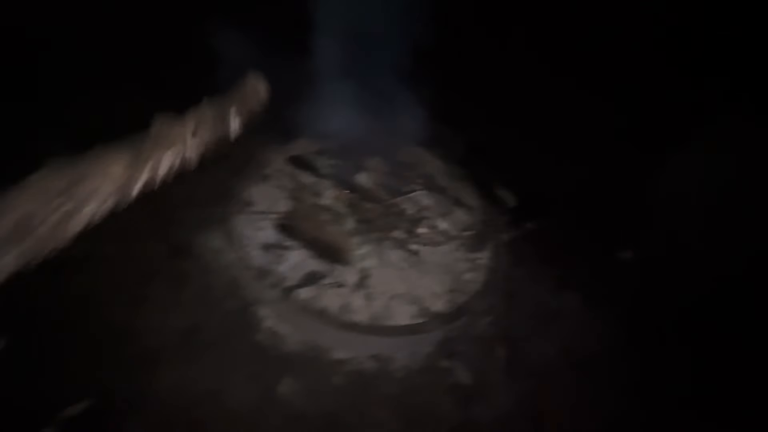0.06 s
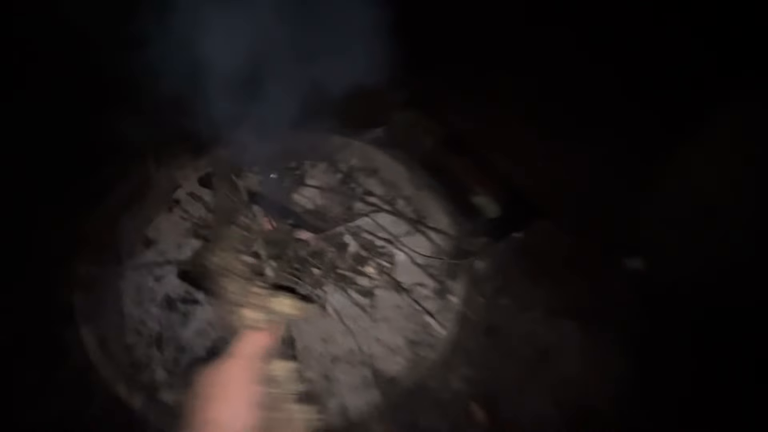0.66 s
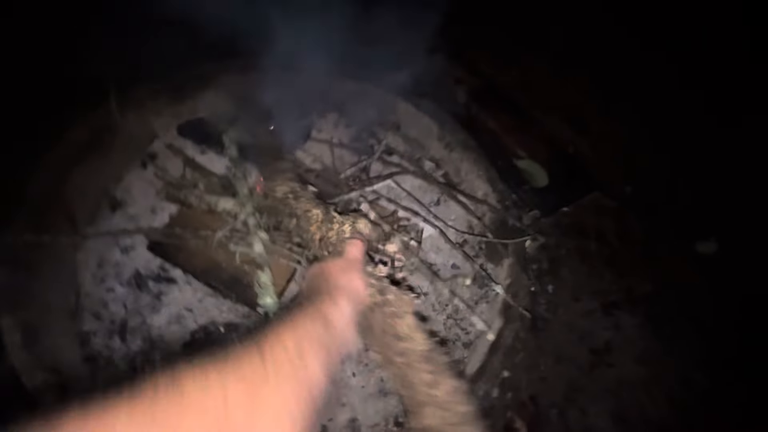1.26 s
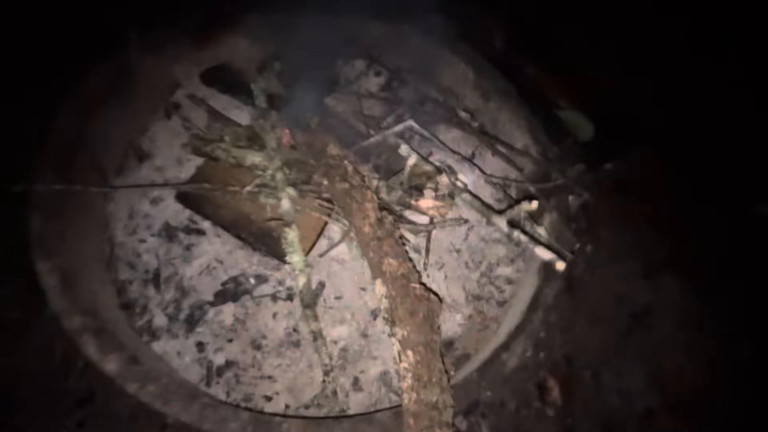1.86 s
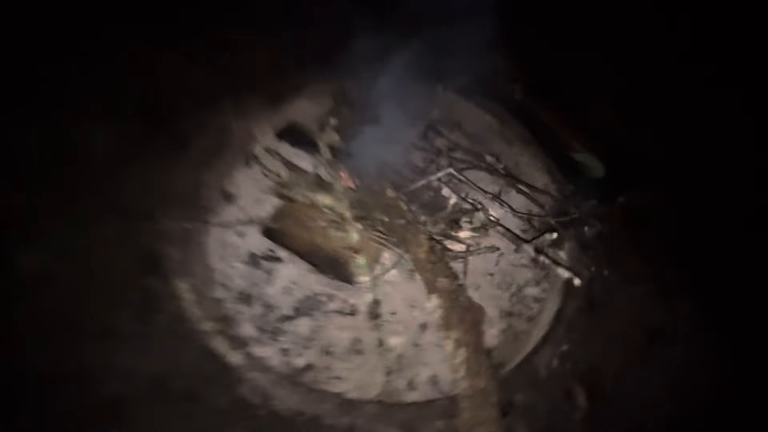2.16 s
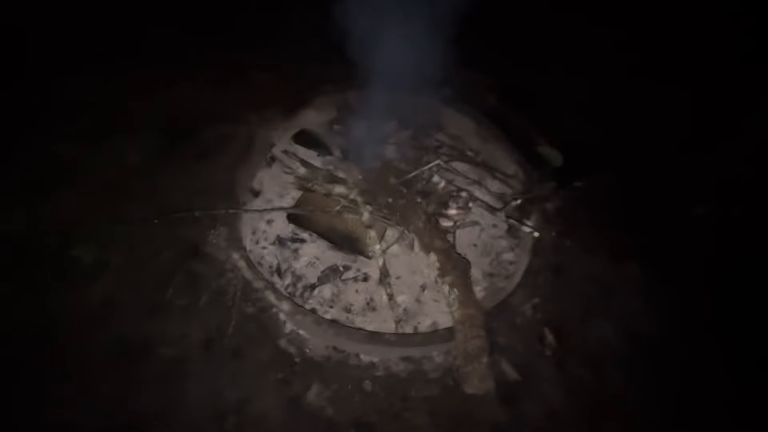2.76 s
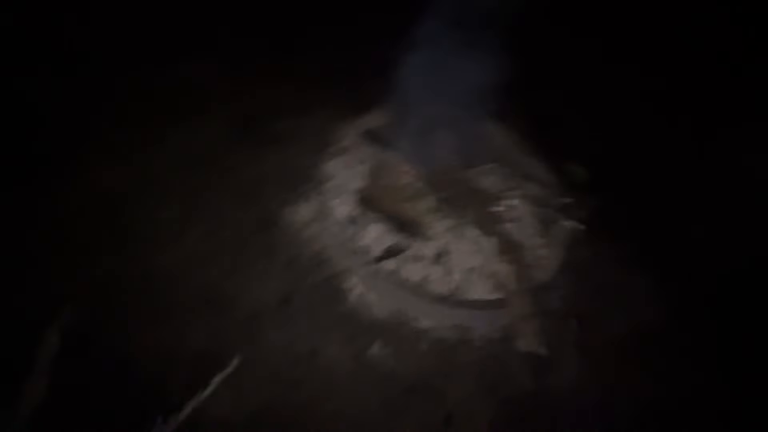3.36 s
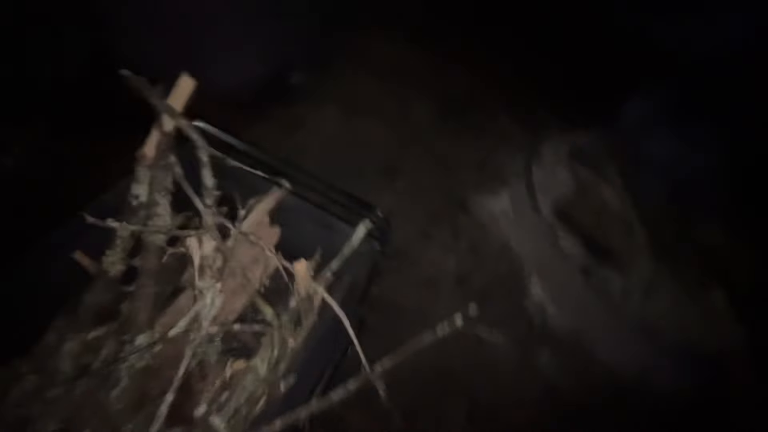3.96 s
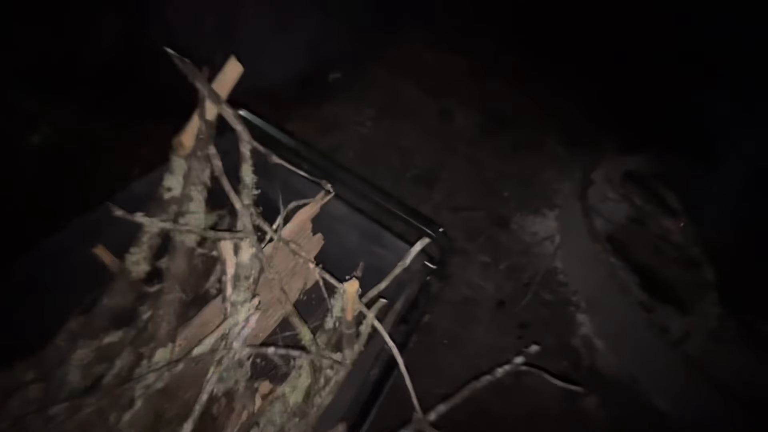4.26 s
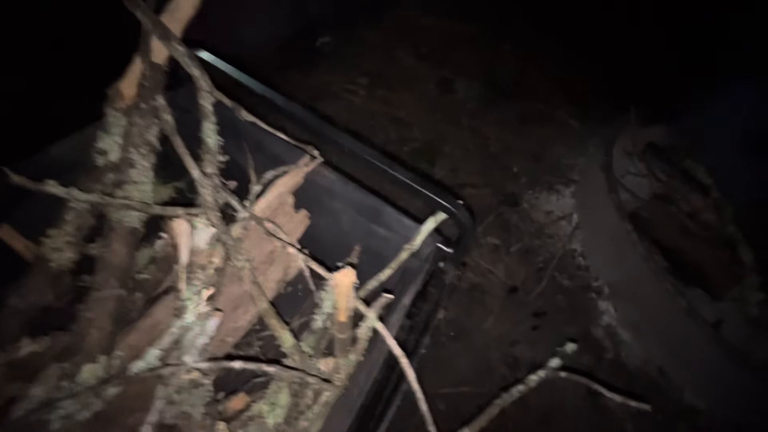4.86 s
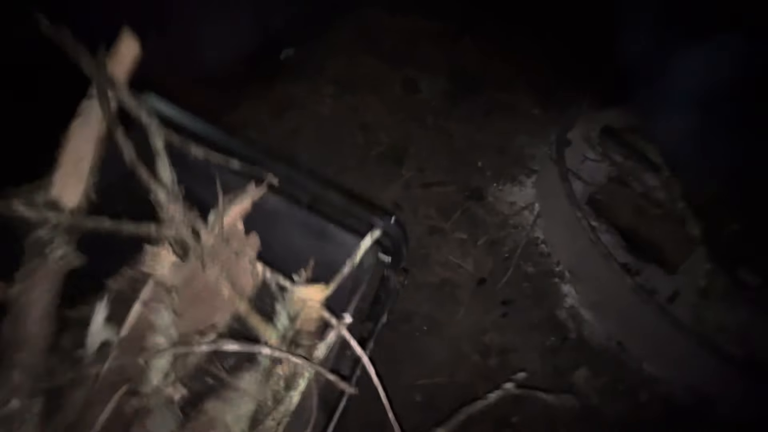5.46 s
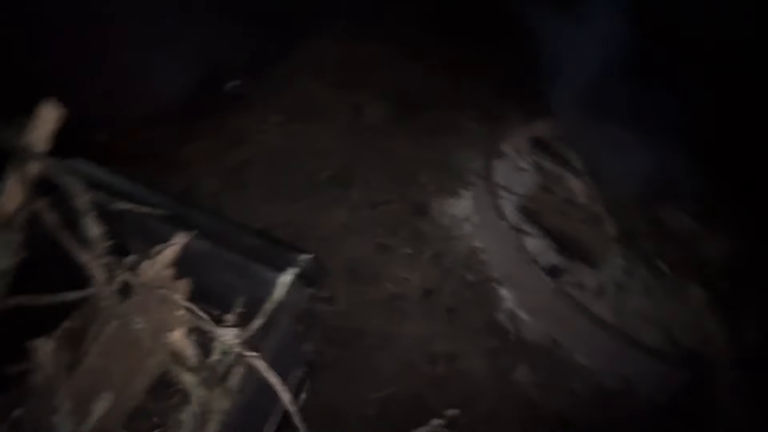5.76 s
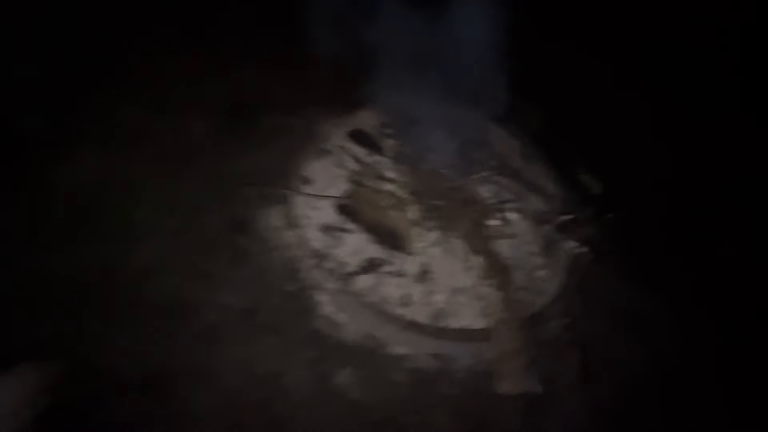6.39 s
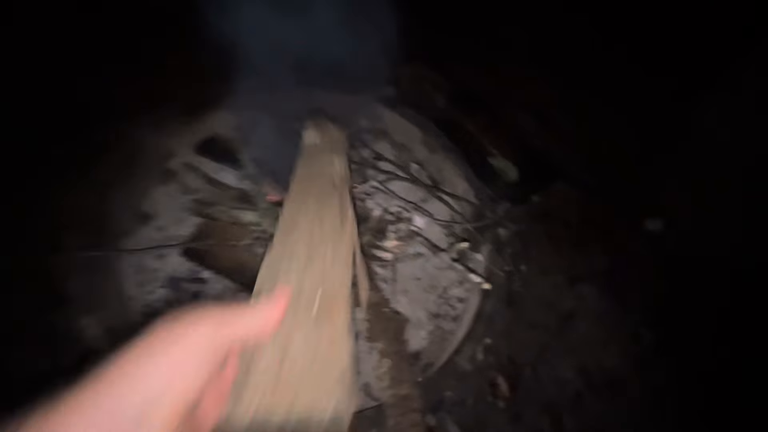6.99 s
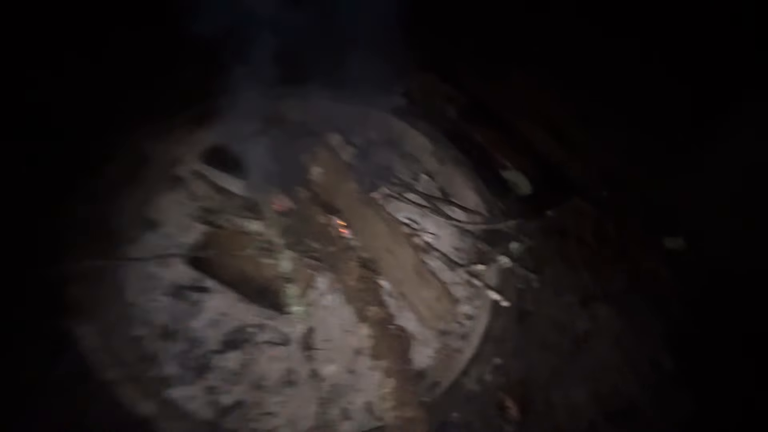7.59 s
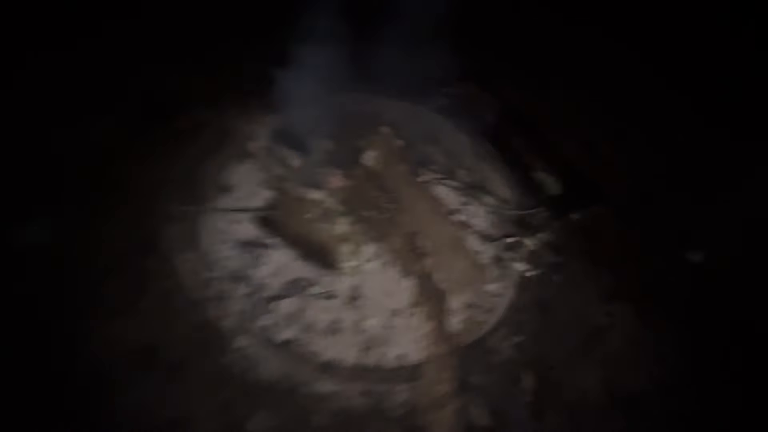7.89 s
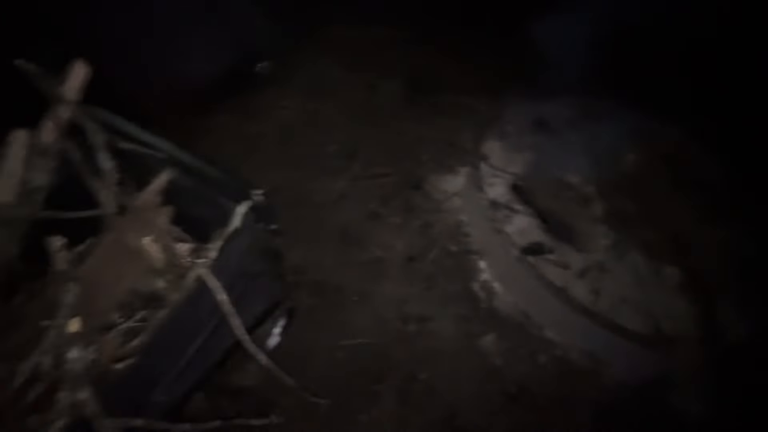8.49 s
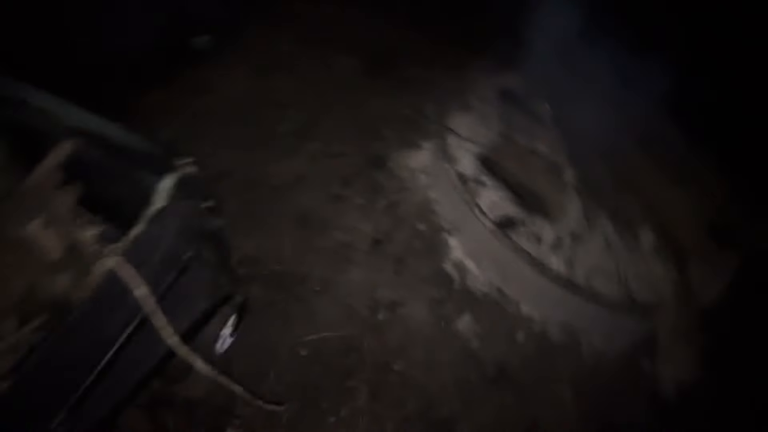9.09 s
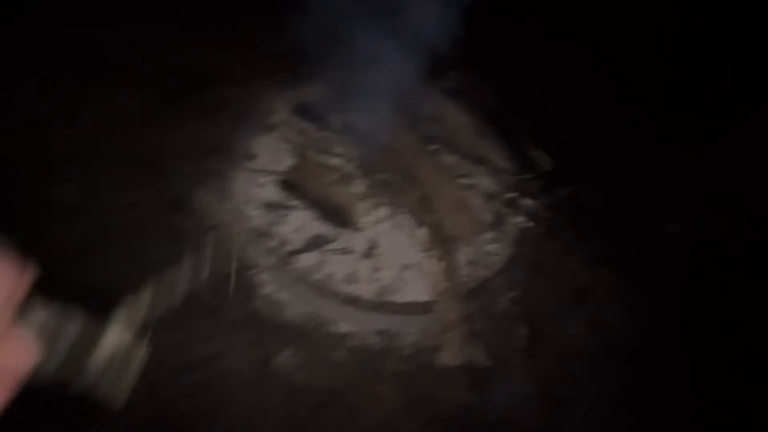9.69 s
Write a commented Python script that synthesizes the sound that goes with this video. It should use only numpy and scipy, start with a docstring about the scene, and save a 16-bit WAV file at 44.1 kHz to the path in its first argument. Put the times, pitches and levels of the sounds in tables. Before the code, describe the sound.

A portable generator hums steadily some way off at a quiet outdoor campsite. Close to the moving microphone, a log is laid on a fire pit with dull knocks and a rasp of bark. After a few soft steps, a plank is dragged from a plastic bin of dry sticks, scraping, snapping twigs and bumping the sides. It then drops on the fire with a sharp crack and thud. Embers tick faintly.

```python
"""Campfire and distant generator

A portable generator hums some way off at a night campsite, its governor gently hunting. Close by, a log
is laid on the fire pit, then a split plank is dragged out of a plastic bin of dry sticks and dropped on
the fire. Wood rasps as it catches and slips, and rings when struck; bark crunches, twigs snap, embers
tick. The engine's colour shifts as the microphone is carried about."""
import sys
import numpy as np
from scipy import signal
from scipy.fft import rfft, irfft, next_fast_len
from scipy.io import wavfile
from scipy.ndimage import uniform_filter1d, map_coordinates

SR = 44100
rng = np.random.default_rng(int(sys.argv[2]) if len(sys.argv) > 2 else 0)


def transcribe(u):
    """Save the signal u as a 16-bit wav file named by the first command-line argument.

    u: samples, shape (n,) or (channels, n), limited to [-1, 1]; the rate is SR.
    q: integer samples, one column per channel.
    """
    v = np.clip(np.atleast_2d(u).T, -1, 1)
    q = np.round(v * 32767).astype(np.int16)
    wavfile.write(sys.argv[1], SR, q)


N = 429532
FFT_SIZE = next_fast_len(N, real=True)
TIME, FREQ = np.arange(N) / SR, np.fft.rfftfreq(FFT_SIZE, 1 / SR)

# The governor hunting: time_s, speed_rpm
ENGINE_SPEED = [(0, 3587), (0.6, 3680), (1.15, 3616), (2.15, 3654), (2.45, 3615), (3.6, 3649), (3.9, 3632),
                (5.2, 3683), (5.95, 3620), (6.35, 3708), (7.1, 3609), (7.35, 3655), (8.15, 3616),
                (8.8, 3700), (9.1, 3646), (9.74, 3630)]
# The listener turning: time_s, turn (0 faces the fire, 1 the bin)
FACING = [(0, .05), (3.3, 0), (3.65, .55), (4.0, 1), (4.6, .85), (5.3, .5), (6.1, .25), (7.1, 0),
          (7.9, .05), (8.3, .65), (8.7, .88), (9.1, .4), (9.74, .05)]
# The three pulses of an engine cycle: harmonic, level_db
INTAKE_TONES = [(1, -67), (2, -45), (3, -51.5), (4, -44)]
EXHAUST_TONES = [(5, -45), (6, -44.5), (7, -51), (8, -47.5)]
MUFFLER_TONES = [(17, -58), (18, -62), (20, -67)]
# Exhaust overtones that swell as the listener moves: harmonic, [time_s, level_db]
EXHAUST_SWELLS = [(9, [(0, -50.5), (2, -51.5), (3.4, -51), (4.2, -61), (4.6, -64), (5.2, -48.5), (7, -51.5),
                  (9.74, -51.5)]), (11, [(0, -51.5), (0.5, -52.5), (1.9, -57.5), (2.7, -85), (3.5, -69),
                  (4.1, -53), (4.5, -50.5), (5.3, -59), (6.1, -60), (7.8, -53), (8.3, -73), (8.8, -58),
                  (9.3, -64), (9.65, -51)])]
# Tone of the mechanical noise: freq_hz, level_db
CLATTER_EQ = [(20, -100), (60, -84), (200, -73.5), (300, -81), (420, -83.5), (560, -83), (680, -88),
              (2000, -86.5), (3700, -89), (5000, -91), (6200, -98.5), (9400, -101), (11500, -117),
              (16000, -117)]
# Panel and cooling fin resonances: pitch_hz, width_hz, boost_db
PANEL_PEAKS = [(2390, 243, 9), (3280, 210, 5.5), (4270, 160, 6.5), (4860, 150, 3.5), (5260, 520, 10.5),
               (7350, 1300, 5)]
# How much of the clatter loops with each cycle: freq_hz, share (0 to 1)
CLATTER_REPEATS = [(300, 0.49), (600, 0.64), (1200, 0), (2500, 0.37), (6000, 0)]
# Muffler shell, tank and valve cover:
# cycle_place (0 to 1), looseness (0 to 1), [pitch_hz, mode_db, t60_s], [time_s, level_db]
RINGING_PARTS = [(0.191, 0.67, [(410, 15, 0.15), (449.5, 16.5, 0.14), (574.6, 7, 0.23)], [(0, -75),
                 (1, -56), (2, -66), (2.6, -52), (3.2, -53), (4.2, -70), (6, -56), (7.1, -63.5), (8.4, -57),
                 (9.74, -56.5)]), (0.0983, 1, [(764, -5, 0.18), (858, 6, 0.082)], [(0, -63), (1, -63),
                 (2.5, -67), (3.1, -53), (3.6, -67), (4.4, -58.5), (6.3, -58), (7.2, -60), (8.4, -66),
                 (8.8, -58), (9.2, -68), (9.74, -71)]), (0.6, 0.088, [(1177, 0, 0.11)], [(0, -57),
                 (0.6, -54), (2.3, -60), (3.4, -49.5), (3.9, -63), (4.5, -53.5), (6.2, -54.5), (7.1, -58),
                 (8, -59), (8.4, -56.5), (9.1, -55.5), (9.74, -52)]), (0.6, 0.11, [(1270, 0, 0.2)],
                 [(0, -60), (1.1, -53), (2.3, -61), (3.4, -51.5), (4, -65), (6.5, -55), (7.6, -57),
                 (8.25, -52.5), (8.8, -64), (9.74, -59)]), (0.56, 0.73, [(1452, 0, 0.15)], [(0, -70),
                 (0.4, -51), (1.2, -72), (2.9, -54), (4, -62), (5, -65), (6.6, -53), (7.4, -59),
                 (9.74, -76)]), (0.39, 0.39, [(2187, 5.5, 0.06), (2270, -2, 0.023)], [(0, -62),
                 (0.6, -57.5), (1.15, -53.5), (1.8, -56), (2.4, -62), (4, -62), (6.3, -65), (7.1, -56),
                 (8.2, -64), (9.74, -73)]), (0.58, 1, [(2780, 0.5, 0.069), (2913, 2, 0.059)], [(0, -66),
                 (1, -60), (2, -62), (3.3, -61.5), (5, -70), (7.1, -60), (8.2, -69), (9.74, -97)]),
                 (0.85, 0.86, [(2396, 7, 0.045), (2527, 2, 0.042)], [(0, -69), (1.2, -75), (2.6, -78),
                 (4.3, -55), (7, -78), (8.7, -89), (9.74, -73)])]
# Fader ride on the metallic whine: time_s, level_db
WHINE_LEVEL = [(0, -68), (.65, -63), (1, -57), (1.45, -73), (3.4, -63), (3.9, -53), (4.2, -67), (7.6, -65),
               (9.74, -85)]
# Left-right likeness of distant and of close sound: freq_hz, correlation
FAR_LIKENESS = [(60, -1), (300, 0.2), (1000, .5), (3000, 0.27), (10000, -0.06)]
NEAR_LIKENESS = [(150, .99), (600, .94), (2000, .7), (8000, .65)]
# Engine hiss and whine flaring as the listener turns, with a scuff or two: start_s, length_s, level_db,
# pitch_hz, spread_octaves
ENGINE_FLARES = [(0.259, 0.52, -57, 6660, 0.19), (2.846, 0.23, -53.5, 1200, 0.2), (3.385, 0.69, -56, 5760, 0.27),
                 (3.946, 0.15, -50, 4860, 0.34), (3.875, .52, -51.5, 1900, 0.058), (6.604, 0.54, -60, 6860, 0.11)]
# Twigs breaking, plus a pair of ember pops at 4.4 s that crack the same way: start_s, level_db, pitch_hz,
# spread_octaves, t60_s, pan_db (left minus right)
TWIG_SNAPS = [(0.467, -36, 3300, 0.6, .016, 0), (0.475, -34, 3500, 0.53, .016, 0),
              (1.234, -31.5, 6960, 1.2, 0.025, -10), (1.3115, -39, 8500, 0.27, 0.02, -7),
              (1.341, -39, 7500, 0.54, .02, -4), (1.398, -43, 8000, 0.53, 0.034, -7),
              (1.453, -36, 2200, 1, 0.023, -12), (1.4746, -41, 8000, .8, .012, -4),
              (1.492, -31, 6000, 1.2, .014, -4), (2.0253, -44, 10000, .7, .012, 0),
              (2.0572, -35, 1700, 0.22, .012, 2), (3.3074, -43, 3500, .6, .025, -4),
              (4.408, -34, 5800, 0.31, 0.013, 5), (4.422, -42, 6000, 0.25, 0.013, 5),
              (4.7432, -45, 8000, .9, .012, 1), (4.7665, -34, 6000, 1.3, 0.013, 3),
              (4.856, -33.5, 5500, 0.48, 0.016, 6), (4.947, -33, 7500, 1.5, 0.02, 3),
              (4.977, -28, 6860, 1, 0.017, 8), (4.989, -43, 9000, .6, .01, 0),
              (5.0972, -34.5, 2000, 1, 0.048, 2), (5.155, -29.5, 7000, 0.72, 0.018, 2),
              (5.232, -33, 3280, 0.49, 0.046, -1), (5.3075, -33, 7000, 1.4, .018, 1),
              (5.3946, -35.5, 3520, 0.35, .03, 12), (5.408, -33, 7000, .9, 0.016, 0),
              (5.363, -36, 3800, 0.39, .02, 2), (5.511, -42, 3200, .7, 0.022, 2),
              (5.547, -36, 4000, 0.63, 0.033, 2), (5.639, -28, 5000, 1.3, 0.011, -6),
              (5.6946, -33, 10500, .3, .012, 0), (5.716, -39, 3000, 1, 0.079, 6),
              (5.7395, -23, 2580, 0.75, 0.052, 2), (5.76, -29, 2940, 1.6, 0.073, -3),
              (5.8602, -36, 6000, 1, .012, 1), (5.8986, -40, 6130, 0.65, .012, 4),
              (7.315, -36.5, 4000, 0.59, 0.076, 0), (7.326, -30, 2200, 0.68, 0.051, 0),
              (7.3364, -8.5, 4940, 0.5, 0.011, -10), (7.36, -18.5, 8600, 0.4, 0.0095, -7),
              (7.373, -33, 2250, 0.07, 0.057, -3), (7.4, -37, 2000, .25, .05, -2),
              (7.459, -46.5, 4600, 0.69, 0.18, -1)]
# Embers popping: start_s, level_db
EMBER_POPS = [(0.7444, -53), (2.904, -46), (6.4294, -50), (6.627, -37), (7.1794, -44), (7.759, -31),
              (8.687, -46), (8.7194, -52), (9.0923, -47)]
# The log sliding onto the fire, the plank out of the bin: hollow_db, pan_db, [time_s, force_db]
DRAGS = [(0, 0, [(1.21, -70), (1.25, -39.5), (1.31, -51.5), (1.42, -47), (1.56, -50), (1.65, -59),
         (2.0, -53), (2.3, -84)]), (1.5, 1.2, [(4.72, -64), (4.79, -48), (4.9, -53.5), (5.03, -50.5),
         (5.12, -47.5), (5.33, -37.5), (5.55, -40.5), (5.61, -43.5), (5.8, -42.5), (5.97, -56.5),
         (6.15, -80)])]
# Tone of the scraping wood and of the pile beneath it: freq_hz, gain_db
RASP_EQ = [(200, -29), (600, -12), (1200, 3), (2500, -4), (5500, -7), (8500, -12.5), (16000, -13.5)]
RUMBLE_EQ = [(20, -36), (50, -3.5), (150, 3.5), (320, 3.5), (550, -7.5), (1200, -18.5), (4000, -115)]
# How each struck thing rings: thing -> [pitch_hz, level_db, t60_s]
MODES = { "log": [(161, -10, 0.12), (460, -7.5, 0.062), (714, 0.5, 0.11), (880, -8, 0.085),
         (1130, -1, 0.037), (1600, 1, 0.04), (2150, 5.5, 0.037), (3200, -15, 0.026)],
         "pit": [(109, -10, 0.13), (197, -8, 0.24), (223, -3.5, 0.14), (303, 5, 0.042), (398, 5, 0.032),
         (726, -12, 0.081), (1290, 3, 0.007)], "branch": [(265, -11, .08), (341, -3.5, 0.11),
         (453, 0, 0.025), (840, 0.5, 0.021), (913, -0.5, 0.06), (1140, -1, 0.041), (1640, -12, .06),
         (2060, -15, 0.081)], "stick": [(845, -0.5, 0.11), (3023, 3.5, 0.036), (3080, -5, 0.039)],
         "bin": [(96, -23, 0.19), (163.3, -8.5, 0.25), (242, -2, 0.076), (293, 5.5, 0.05),
         (330, 4.5, 0.034), (600, 0, 0.042), (744, -6.5, 0.042), (914, -10, 0.045), (1260, -16, 0.12),
         (1580, -16.5, 0.065), (2000, -2, 0.02)], "stump": [(453, -2, 0.03), (567, 4, 0.025),
         (699, 2.5, 0.047), (903, 5.5, 0.021), (937, 4, 0.028), (1310, -2, 0.028)],
         "plank": [(551, -15.5, 0.065), (1014, -9, 0.092), (1370, -3.5, 0.02), (1617, -4.5, 0.046),
         (1770, 0, 0.013), (2260, -18, 0.18), (3780, 8, 0.011), (3950, 13.5, 0.01), (4400, 5.5, 0.0091),
         (5260, 7, 0.0064), (5520, -8, 0.013), (8000, -5, 0.0086)]}
# Wood hits: start_s, thing, level_db, contact_hz (top of the range it excites), crunch_db, pan_db
KNOCKS = [(1.2335, "log", -37, 1090, -46, 0), (1.248, "log", -21, 820, -53, 1),
          (1.26, "log", -18, 200, -60, -5), (1.352, "log", -42, 1360, -37.5, -2),
          (1.402, "log", -49, 980, -44, -3), (1.4905, "log", -34.5, 2900, -39, -8),
          (1.5446, "pit", -21, 1470, -36, -1.5), (1.5758, "pit", -33.5, 500, -55, -4),
          (1.598, "pit", -38, 920, -43, -1.5), (4.771, "branch", -18.5, 2400, -30, 1),
          (5.066, "bin", -32, 594, -43, 3), (5.082, "bin", -27, 300, -52, 7),
          (5.095, "bin", -28, 280, -52, 1), (5.157, "stick", -25.5, 6140, -34, -0.5),
          (5.6402, "stump", -16, 1990, -28, 2.5), (5.719, "bin", -22.5, 525, -54, 3),
          (5.7462, "bin", -12.5, 1930, -27.5, 4), (5.767, "bin", -25, 1180, -29.5, 6),
          (7.3377, "plank", -14, 9000, -24, 1.5), (7.353, "plank", -3, 680, -32, -1)]
# Litter underfoot: start_s, level_db, t60_s, pan_db
FOOTSTEPS = [(2.0572, -30, 0.016, 2), (2.914, -44, 0.071, 4), (3.175, -38, 0.04, 11),
             (5.926, -38.5, 0.032, 8), (6.627, -40.5, 0.035, 5)]
# Thuds on the ground and the bin: start_s, level_db, pan_db
BUMPS = [(2.058, -39, 14), (2.159, -42, 0), (5.085, -32, 9)]
# Unequal colour of the two microphone ports: freq_hz, left_minus_right_db
PORT_TILT = [(60, -4), (300, -2.5), (500, -3), (800, 4), (2200, 1.5), (3000, 2.5), (4200, 7), (6400, 12.5),
             (8200, -1), (15000, -0.5)]

ON_FIRE = ("log", "pit", "plank")
BIN_LEAD_S, FIRE_LEAD_S = .00032, .00015  # how much sooner the left port hears each spot


def amp(db):
    """Decibels to gain."""
    return 10 ** (np.asarray(db) / 20)


def unit_rms(x):
    """Scales to rms 1."""
    return x / np.sqrt(np.mean(x ** 2) + 1e-20)


def over_time(points):
    """Draws an automation curve through the points."""
    return np.interp(TIME, *np.transpose(points))


def over_freq(points, hz=FREQ):
    """Draws a curve through the points on a log-frequency axis."""
    f, value = np.transpose(points)
    return np.interp(np.log(hz + 1), np.log(f + 1), value)


def to_sound(spectrum):
    """Turns a full-length spectrum into sound."""
    return irfft(spectrum, FFT_SIZE)[..., :N]


def panned(db):
    """Left and right gains for a level difference."""
    return amp(np.array([[db], [-db]]) / 2)


def add(mix, start_s, sound):
    """Drops a sound into the mix."""
    part = mix[:, round(start_s * SR):][:, :sound.shape[1]]
    part += sound[:, :part.shape[1]]


def paired(z, likeness):
    """Makes the second of two unrelated signals partly like the first."""
    c = np.clip(likeness, -1, 1)
    return np.array([z[0], c * z[0] + np.sqrt(1 - c ** 2) * z[1]])


def arriving(x, lead_s):
    """Lets a sound reach the left port sooner than the right."""
    return np.array([map_coordinates(channel, [(TIME + side * lead_s) * SR], order=3)
                     for channel, side in zip(x, (.5, -.5))])


def noise_band(size, hz, octaves):
    """Stereo noise in a bell around hz."""
    f = np.fft.rfftfreq(size, 1 / SR) + 1
    bell = np.exp(-(np.log2(f / hz) / octaves) ** 2 / 4)
    noise = paired(rfft(rng.standard_normal((2, size))), over_freq(NEAR_LIKENESS, f))
    return unit_rms(irfft(noise * bell, size))


def burst(hz, octaves, t60, rise_s=0.001, grain_db=6.0):
    """A quick, ragged burst of noise that dies away, as when fibres break."""
    t = np.arange(8192) / SR
    grain = unit_rms(uniform_filter1d(rng.standard_normal(len(t)), int(4 * SR / hz) + 1))
    fade = amp(-60 * t / t60) * (1 - np.exp(-t / rise_s))
    ragged = noise_band(len(t), hz, octaves) * amp(grain_db * grain)
    return unit_rms(ragged * fade) * np.sqrt(np.mean(fade ** 2))


def wander():
    """A slow random drift of rms 1."""
    sways = (np.sin(2 * np.pi * (hz * TIME[::256] + rng.random())) for hz in np.geomspace(.3, 1.6, 12))
    return unit_rms(sum(sways)).repeat(256)[:N]


def hum(cycles, intake_at=0.016, exhaust_at=0.4134, muffler_at=0.2586, uneven=0.059):
    """Each cycle gulps air, shakes the muffler and puffs exhaust; no two firings are quite equal."""
    def pulse(tones, at):
        return sum(amp(db) * np.cos(2 * np.pi * round(k) * (cycles - at)) for k, db in tones)

    count = int(cycles[-1]) + 3
    strength = 1 + uneven * np.interp(cycles, np.arange(count), rng.standard_normal(count))
    swells = [(k, over_time(level)) for k, level in EXHAUST_SWELLS]
    exhaust = pulse(EXHAUST_TONES + swells, exhaust_at)
    return strength * (pulse(INTAKE_TONES, intake_at) - exhaust + pulse(MUFFLER_TONES, muffler_at))


def chuff(cycles, level_db=-56.0, at=0.26, width=0.31):
    """Gas rushes out of the muffler with every firing: a round, breathy puff."""
    from_peak = (cycles - at + .5) % 1 - .5
    gate = np.exp(-(from_peak / width) ** 2)
    return amp(level_db) * unit_rms(gate * noise_band(FFT_SIZE, hz=480, octaves=0.18)[:, :N])


def clatter(cycles, valve_at=0.9, valve_width=0.16, valve_gain=0.2, loop_size=1453):
    """A rattle that repeats each cycle and fan noise that does not, both ringing in the panels."""
    place = cycles % 1
    loops = signal.resample(rng.standard_normal((2, loop_size)), 4 * loop_size, axis=1)
    rattle = np.array([np.interp(place, np.linspace(0, 1, len(loop)), loop) for loop in loops])
    fan = rng.standard_normal((2, N))
    valves = unit_rms(1 + valve_gain * np.exp(-((place - valve_at) / valve_width) ** 2))
    share = np.clip(over_freq(CLATTER_REPEATS), 0, 1)
    blend = np.sqrt(share) * rfft(rattle * valves, FFT_SIZE)
    blend += np.sqrt(1 - share) * rfft(fan * valves, FFT_SIZE)
    panels_db = sum(db / (1 + (2 * (FREQ - hz) / width) ** 2) for hz, width, db in PANEL_PEAKS)
    colour = amp(over_freq(CLATTER_EQ) + panels_db) * np.sqrt(SR / 2)
    return paired(blend, over_freq(FAR_LIKENESS)) * colour  # a spectrum


def ringing_part(cycles, place, looseness, modes, rise_s=0.002, scatter_s=.00016, uneven=.45):
    """Every cycle strikes an engine part again: a tight one sings, a loose one chatters."""
    t, beats = np.arange(SR // 8) / SR, np.arange(int(cycles[-1]) + 1)
    hit_s = np.interp(beats + place, cycles, TIME)
    hit_s += looseness * scatter_s * rng.standard_normal(len(beats))
    strength = 1 + looseness * uneven * rng.standard_normal(len(beats))
    blows = np.zeros(N)
    blows[np.clip(hit_s * SR, 0, N - 1).astype(int)] = strength
    ring = sum(amp(db - 60 * t / t60) * np.sin(2 * np.pi * hz * t) for hz, db, t60 in modes)
    attack = 1 - np.exp(-t / rise_s)
    return unit_rms(signal.oaconvolve(blows, ring * attack)[:N])


def whine(cycles, harmonic=143, width_hz=40):
    """A thin, blurred tone that follows the engine speed and beats with its neighbour."""
    blur = np.cumsum(rng.standard_normal((2, 2, N)), axis=2) * np.sqrt(2 * np.pi * width_hz / SR)
    tone, neighbour = (np.cos(2 * np.pi * (harmonic + k) * cycles + blur[k]) for k in (0, 1))
    return amp(over_time(WHINE_LEVEL)) * unit_rms(tone + neighbour)


def roaming_echoes(x, echo_gain=0.22, spacing_s=.002, sway_s=0.00025, count=3):
    """Echoes from nearby things slide in delay as the microphone is carried: a faint flanging."""
    out = x.copy()
    for k in range(count):
        sway = sum(np.sin(2 * np.pi * (hz * TIME + rng.random())) for hz in (.09, .23)) / 2
        delay_s = spacing_s * (k + 1) + sway_s * sway
        out += echo_gain * np.array([map_coordinates(c, [(TIME - delay_s) * SR], order=2) for c in x])
    return out / np.sqrt(1 + count * echo_gain ** 2)


def generator(hiss_hz=1900, drift_db=0.5):
    """A four-stroke engine off to the left; turning to the bin pulls it inward and shades its treble."""
    cycles = np.cumsum(over_time(ENGINE_SPEED) / 120) / SR - .199  # one firing per two shaft turns
    facing = over_time(FACING)
    spectrum = clatter(cycles)
    lowpass = 1 / (1 + (FREQ / hiss_hz) ** 6)
    rattle = amp(4.5 + 0.6 * facing + drift_db * wander()) * to_sound(spectrum * lowpass)
    hiss = amp(-0.5 - 2.5 * facing) * to_sound(spectrum * (1 - lowpass))
    body = amp(-0.72 + 1.7 * facing) * hum(cycles) + chuff(cycles)
    # The parts beam their sound unevenly, so each swells and fades as the listener moves.
    ringing = sum(amp(over_time(level)) * ringing_part(cycles, place, looseness, modes)
                  for place, looseness, modes, level in RINGING_PARTS)
    engine = body + ringing + whine(cycles) + roaming_echoes(rattle + hiss)
    return arriving(engine, lead_s=np.interp(facing, [0, 1], [.00044, .00012]))


def engine_flares():
    """Soft bands of engine hiss and whine swell and fade as the listener moves, with a brief scuff or two."""
    out = np.zeros((2, N))
    for start_s, length_s, db, hz, octaves in ENGINE_FLARES:
        size = int(length_s * SR)
        add(out, start_s, amp(db) * noise_band(size, hz, octaves) * np.hanning(size))
    return out


def twig_snaps():
    """Dry twigs and splinters give way, and a couple of embers pop, each with its own crack."""
    out = np.zeros((2, N))
    for start_s, db, hz, octaves, t60, pan_db in TWIG_SNAPS:
        add(out, start_s, amp(db) * panned(pan_db) * burst(hz, octaves, t60))
    return out


def embers():
    """Embers pop in tiny, bright ticks."""
    out = np.zeros((2, N))
    for start_s, db in EMBER_POPS:
        add(out, start_s, amp(db) * burst(hz=7000, octaves=0.67, t60=0.013))
    return out


def drags(catches_per_s=2500, size_db=-1.5, jerk_db=1.3, jerk_s=0.021):
    """Bark catches and slips in tiny jerks that rasp and rumble the pile; knocks stir the rumble too."""
    catches = (rng.random(N) < catches_per_s / SR) * amp(size_db * np.minimum(rng.exponential(1, N), 3))
    jerks = amp(jerk_db * unit_rms(uniform_filter1d(rng.standard_normal(N), int(jerk_s * SR) + 1)))
    clicks = jerks * catches * rng.choice([-1, 1], (2, N))
    friction = paired(rfft(clicks, FFT_SIZE), over_freq(NEAR_LIKENESS))
    rasp = unit_rms(to_sound(friction * amp(over_freq(RASP_EQ))))
    rumble = unit_rms(to_sound(friction * amp(over_freq(RUMBLE_EQ)))) * panned(4.7)
    out = pile_shake() * rumble
    for hollow_db, pan_db, force in DRAGS:
        time_s, force_db = np.transpose(force)
        sliding = (TIME > time_s[0]) & (TIME < time_s[-1])
        pull = sliding * amp(np.interp(TIME, time_s, force_db))
        out += pull * (panned(pan_db) * rasp + amp(hollow_db) * rumble)
    return out


def splinters(per_s=55, pitch_hz=3700, scatter_octaves=0.8, lift_db=1, spread_db=4, width_db=4):
    """Bits of bark catch and ping at random during a drag, louder the harder it pulls."""
    out = np.zeros((2, N))
    for _, pan_db, force in DRAGS:
        time_s, force_db = np.transpose(force)
        count = int(per_s * (time_s[-1] - time_s[0]))
        for place, size, pitch, side in rng.uniform(-1, 1, (count, 4)):
            start_s = np.interp(place, [-1, 1], [time_s[0], time_s[-1]])
            db = np.interp(start_s, time_s, force_db) + lift_db + spread_db * size
            ping = burst(pitch_hz * 2 ** (scatter_octaves * pitch), octaves=0.35, t60=0.018)
            add(out, start_s, amp(db) * panned(pan_db + width_db * side) * ping)
    return out


def knocks(crunch_cycles=75, crunch_lead_cycles=1.535):
    """Each blow crushes bark and rings the thing struck; a soft contact gives a slow, dull attack."""
    out = np.zeros((2, N))
    for start_s, thing, db, contact_hz, crunch_db, pan_db in KNOCKS:
        lead_s = FIRE_LEAD_S if thing in ON_FIRE else BIN_LEAD_S
        t = np.maximum(np.arange(SR // 3) / SR - np.array([[0], [lead_s]]), 0)
        ring = np.zeros_like(t)
        for k, (hz, mode_db, t60) in enumerate(MODES[thing]):
            drive = (-1) ** k / np.sqrt(1 + (hz / contact_hz) ** 6)
            ring += drive * amp(mode_db - 60 * t / t60) * np.sin(2 * np.pi * hz * t)
        attack = 1 - np.exp(-2 * t * contact_hz)
        add(out, start_s, amp(db) * panned(pan_db) * ring * attack)
        # The crunch lands just ahead of the knock, brighter and shorter for a harder contact.
        crunch_hz = 1140 * (contact_hz / 1000) ** 0.42
        crunch = burst(crunch_hz, octaves=0.86, t60=crunch_cycles / crunch_hz)
        add(out, start_s - crunch_lead_cycles / contact_hz, amp(crunch_db) * panned(pan_db) * crunch)
    return out


def pile_shake(bin_db=-18, fire_db=-30, t60=0.2):
    """Envelope of the rumble after each knock: the hollow bin shakes more than the bed of ash."""
    envelope, t = np.zeros((1, N)), np.arange(SR // 2)[None] / SR
    for start_s, thing, db, *_ in KNOCKS:
        shake_db = fire_db if thing in ON_FIRE else bin_db
        add(envelope, start_s, amp(db + shake_db - 60 * t / t60))
    return envelope


def footsteps():
    """Litter cracks underfoot with a midrange crunch."""
    out = np.zeros((2, N))
    for start_s, db, t60, pan_db in FOOTSTEPS:
        add(out, start_s, amp(db) * panned(pan_db) * burst(hz=1140, octaves=0.33, t60=t60))
    return out


def bumps():
    """Dull, low thuds against the ground and the bin."""
    out = np.zeros((2, N))
    for start_s, db, pan_db in BUMPS:
        add(out, start_s, amp(db) * panned(pan_db) * burst(hz=72.5, octaves=0.59, t60=0.15))
    return out


def open_air(x, wet_db=-17, t60=0.3, treble_t60=0.16, treble_hz=2800, delay_s=0.0023, taps_per_s=3000):
    """A brief scatter off the ground, pit and bin; ash and soil soak up the treble first."""
    t = np.arange(SR // 3) / SR
    taps = rng.standard_normal((2, len(t))) * (rng.random((2, len(t))) < taps_per_s / SR) * (t > delay_s)
    low = signal.sosfiltfilt(signal.butter(4, treble_hz, fs=SR, output="sos"), taps)
    decay = amp(-60 * t / t60)
    tail = low * decay + (taps - low) * amp(-60 * t / treble_t60)
    tail /= np.linalg.norm(taps[0] * decay)
    return x + amp(wet_db) * signal.oaconvolve(x, tail, axes=1)[:, :N]


def scene():
    """The engine as a steady bed, the firewood and footwork up front."""
    bed = generator()
    hits = knocks() + twig_snaps() + embers() + footsteps() + bumps() + splinters()
    return bed + open_air(hits) + arriving(drags(), BIN_LEAD_S) + engine_flares()


def record(dry, ceiling=.95, cutoff_hz=16100):
    """Each port adds its own colour, the sharpest crack is softly clipped and the top end is cut."""
    port_gains = amp(over_freq(PORT_TILT) * np.array([[.5], [-.5]]))
    coloured = to_sound(rfft(dry, FFT_SIZE) * port_gains)
    clipped = ceiling * np.tanh(coloured / ceiling)
    lowpass = signal.firwin(401, cutoff_hz, window=("kaiser", 9), fs=SR)
    return signal.oaconvolve(clipped, lowpass[None], "same")


dry = scene()
out = record(dry)
transcribe(out)
```